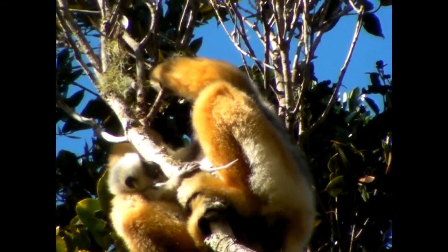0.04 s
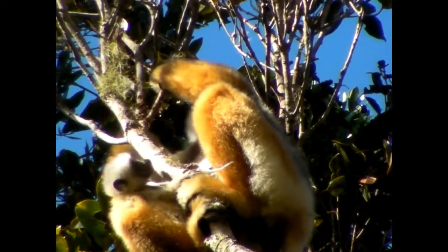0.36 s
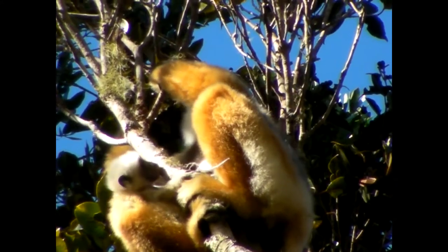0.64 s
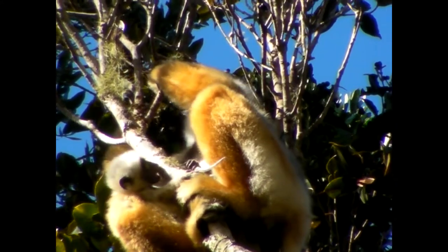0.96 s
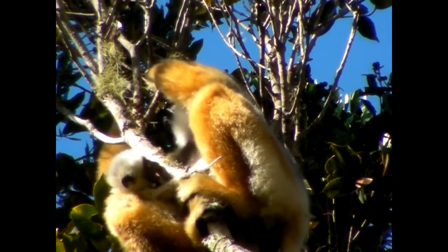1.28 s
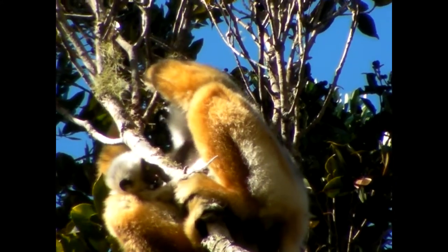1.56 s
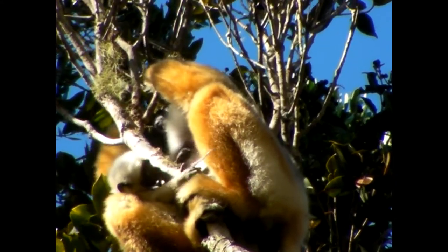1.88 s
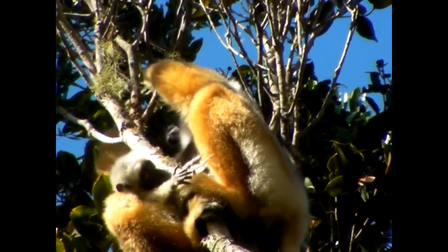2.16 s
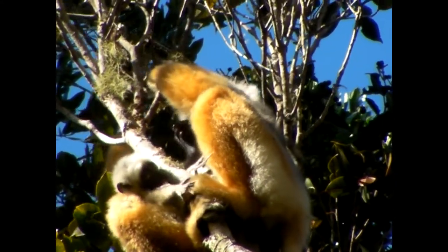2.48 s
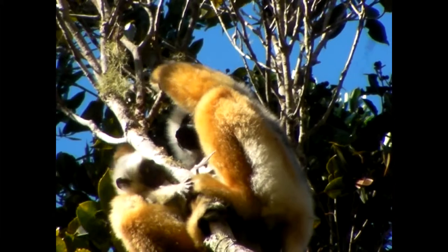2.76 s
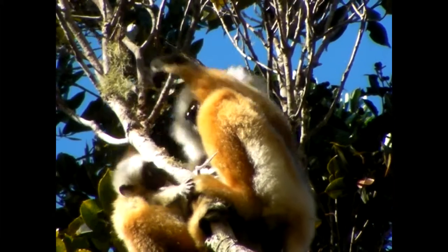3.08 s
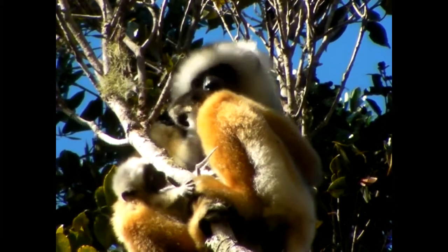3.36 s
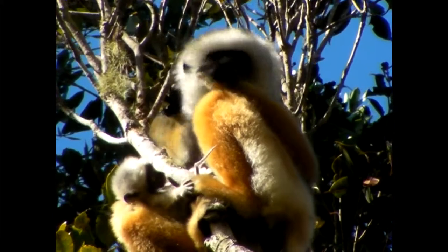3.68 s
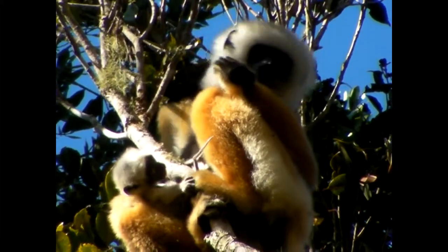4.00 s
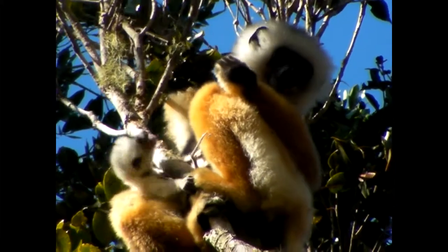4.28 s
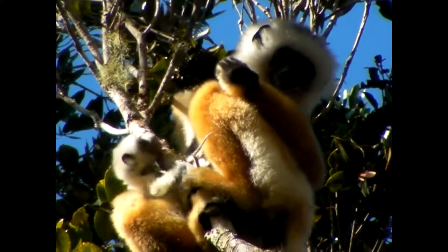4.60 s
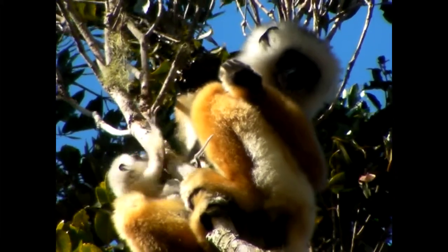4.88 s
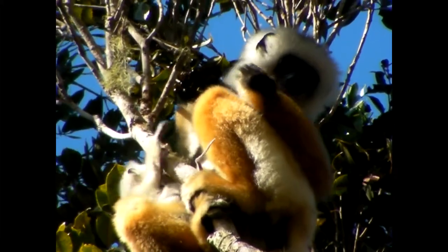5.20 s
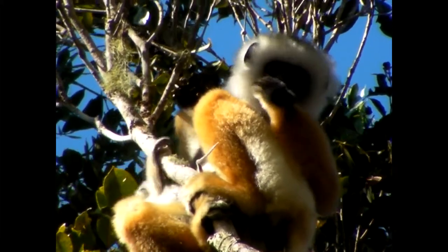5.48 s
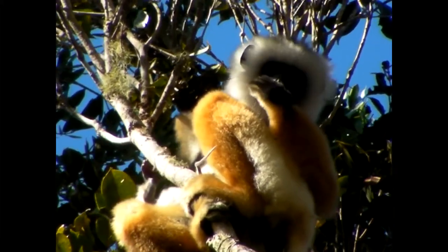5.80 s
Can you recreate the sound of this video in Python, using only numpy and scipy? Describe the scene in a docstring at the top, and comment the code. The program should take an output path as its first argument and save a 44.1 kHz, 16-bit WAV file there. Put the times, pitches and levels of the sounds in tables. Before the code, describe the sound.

Dry leaves click and twigs crack at irregular moments overhead in a still forest, as animals move about on a branch. Soft rubbing and brief swells of leafy hiss run between the snaps. The sharpest cracks cluster just past halfway, after which the movement settles into lighter ticks. The microphone also picks up faint, steady air noise and a slight hollow hum.

```python
"""Lemurs grooming in a treetop

Lemurs groom and shift about overhead on a still day. Twigs and dry leaves break with an impulse,
ring in damped modes and leave a short shiver of foliage. Friction of fur, twigs and leaves makes a
grainy rustle with stray ticks and drags; hiss and rubbing noise swell briefly, mostly around the snaps.
Under it lie faint forest air, microphone hiss and a hollow hum near 420 Hz from the camera body."""
import sys
import numpy as np
from scipy import signal
from scipy.fft import rfft, irfft
from scipy.io import wavfile

SR = 44100
rng = np.random.default_rng(int(sys.argv[2]) if len(sys.argv) > 2 else 0)


def bounce(signal):
    """Save signal as a 16-bit WAV file at the path given by the first command-line argument."""
    frames = np.transpose(np.atleast_2d(signal))
    limited = np.clip(frames, -1, 1)
    pcm = np.round(limited * 32767).astype(np.int16)
    wavfile.write(sys.argv[1], SR, pcm)


N = 266805
HZ = np.fft.rfftfreq(N, 1 / SR)
TIME = np.arange(N) / SR

# left-right coherence of rubbing and of snapping: (frequency [Hz], coherence [0-1])
RUB_COHERENCE = [(60, 0.6), (600, 0.94), (1400, 0.79), (3100, 0.6), (6800, 0.025), (15000, 0.046)]
SNAP_COHERENCE = [(100, 0.71), (2500, 0.91), (5500, 0.46), (9000, 0.46), (15000, 0.32)]
# balance of sound from the tree: (frequency [Hz], left minus right [dB])
TREE_BALANCE = [(60, -1), (500, 2), (1300, 1.1), (2500, 0), (5000, 0), (8500, -2.5), (15000, -3.5)]


def gain_of(db):
    """Amplitude grows tenfold for every 20 dB."""
    return 10 ** (np.asarray(db) / 20)


def unit_rms(x):
    """Normalisation to a mean power of one."""
    return x / np.sqrt(np.mean(x ** 2) + 1e-20)


def unit_energy(x):
    """Normalisation to a total energy of one."""
    return x / np.sqrt(np.sum(x ** 2) + 1e-20)


def curve_at(points, hz):
    """Interpolation along a logarithmic frequency axis."""
    knots_hz, values = np.transpose(points)
    return np.interp(np.log(hz + 1), np.log(knots_hz + 1), values)


def add(mix, start_s, sound):
    """Superposition: a sound adds to the mix from its start time on."""
    part = mix[:, max(round(start_s * SR), 0):][:, :sound.shape[1]]
    part += sound[:, :part.shape[1]]


def drift(cutoff_hz):
    """Low-passed noise gives a slow random modulation of unit rms."""
    return unit_rms(irfft(rfft(rng.standard_normal(N)) / (1 + (HZ / cutoff_hz) ** 4), N))


def coloured(x, spectrum):
    """Zero-phase filtering imposes a spectral envelope, at unit rms."""
    return unit_rms(irfft(rfft(x) * gain_of(curve_at(spectrum, HZ)), N))


def causal(x, gain_db):
    """A minimum-phase filter is causal: nothing rings before the blow."""
    log_gain = np.log(gain_of(np.r_[gain_db, gain_db[-2:0:-1]]))
    response = np.exp(np.conj(signal.hilbert(log_gain)))[:len(gain_db)]
    return irfft(rfft(x) * response)


def stereo(pair, coherence, balance, left_lag_s=0.):
    """Partial coherence: the weighted sum and difference of two signals become left and right."""
    first, second = rfft(pair)
    alike, lean_db = np.clip(curve_at(coherence, HZ), -1, 1), curve_at(balance, HZ) / 2
    mid, side = first * np.sqrt((1 + alike) / 2), second * np.sqrt((1 - alike) / 2)
    delay = np.exp(-2j * np.pi * HZ * left_lag_s)
    return irfft(np.array([(mid + side) * gain_of(lean_db) * delay, (mid - side) * gain_of(-lean_db)]), N)


def gritty(spread_db, size):
    """Tiny slips of very unequal strength make heavy-tailed noise."""
    return rng.standard_normal(size) * gain_of(spread_db * np.minimum(rng.exponential(1, size), 4))


def air_and_hum(level_db=-59, hum_hz=420, width_hz=130, waver_db=3):
    """Broadband noise of faint air and hiss, plus a wavering hollow hum: the camera body's resonance."""
    # air, hiss and the camera body's hum: (frequency [Hz], relative spectral level [dB])
    spectrum = [(25, -32), (75, -12), (160, -8.5), (290, -18), (350, -8.5), (410, 2), (470, -1.5),
                (560, -8), (900, -11.5), (2800, -13), (5000, -13), (8600, -13), (12000, -15.5),
                (16000, -21)]
    # diffuse background: (frequency [Hz], left-right coherence [0-1])
    coherence = [(60, 0.57), (400, 0.65), (1400, 0.23), (3100, 0.14), (6800, 0)]
    # its balance: (frequency [Hz], left minus right [dB])
    balance = [(60, 0.5), (400, 1), (1300, 1.5), (2400, -0.5), (8000, -1), (15000, 0)]
    pair = np.array([coloured(rng.standard_normal(N), spectrum) for _ in range(2)])
    hum = irfft(rfft(pair) * np.exp(-((HZ - hum_hz) / width_hz) ** 2), N)
    pair += hum * (gain_of(waver_db * drift(6.7)) - 1)
    return stereo(pair, coherence, balance) * gain_of(level_db)


def swell_envelope(swells, rise_share=0.38, fade_db=14):
    """Amplitude envelope of short swells that rise and fall exponentially and add in power."""
    power = np.zeros((1, N))
    for peak_s, length_s, db in swells:
        start_s = max(peak_s - 2 * length_s, 0)
        from_peak = (np.arange(start_s, peak_s + 2 * length_s, 1 / SR) - peak_s) / length_s
        drop_db = fade_db * np.maximum(-from_peak / rise_share, from_peak / (1 - rise_share))
        add(power, start_s, gain_of(db - drop_db)[None] ** 2)
    return np.sqrt(power[0])


def rubbing_levels(full_stroke_db=-54.5, effort_slope=1.18):
    """Incoherent sounds add in power: grooming and short swells set fur, scrape and fizz levels in dB."""
    # how hard the animals groom, one long bout and then small shifts: (time [s], effort [dB])
    effort = [(0, -64.5), (.39, -68), (.66, -60.5), (1.0, -65.5), (1.18, -69), (1.45, -54.5), (1.72, -55.5),
              (1.86, -55), (2.07, -57.5), (2.3, -55), (2.68, -56.5), (2.9, -53), (3.05, -60.5), (3.26, -63),
              (3.55, -58.5), (3.8, -59.5), (4.05, -53.5), (4.24, -67), (4.55, -61.5), (4.8, -66),
              (5.7, -59.5), (6.05, -64.5)]
    # short swells of high hiss and rubbing noise, mostly around the snaps, levels relative:
    # (peak time [s], length [s], high hiss [dB], rubbing noise [dB])
    swells = [(.01, .15, -61, -62), (0.301, 0.041, -44, -57), (0.479, .07, -50, -59),
              (0.685, 0.06, -44.5, -57), (0.803, 0.065, -52, -56), (0.897, 0.11, -49.5, -60),
              (1.056, 0.085, -52, -65), (1.28, 0.3, -52, -58), (1.49, .12, -52, -63),
              (1.629, .08, -52, -53), (2.058, 0.37, -50, -59.5), (2.178, 0.17, -50, -53),
              (2.53, 0.14, -40.5, -50), (2.904, 0.21, -55.5, -58), (3.172, 0.09, -40, -55),
              (3.309, .06, -42, -52), (3.396, .07, -42, -49), (3.523, 0.087, -47.5, -51),
              (3.713, 0.1, -43.5, -53), (3.936, .1, -39, -47), (4.076, 0.15, -45, -55.5),
              (4.46, 0.093, -52.5, -60), (4.939, 0.092, -45, -55.5), (5.08, 0.17, -55, -63),
              (5.244, 0.079, -51.5, -59.5), (5.424, 0.17, -53, -60), (5.673, 0.19, -50.5, -63)]
    effort_db = np.interp(TIME, *np.transpose(effort))
    grooming = gain_of(full_stroke_db + effort_slope * (effort_db - full_stroke_db))
    hiss_swells = swell_envelope([(s, length, db) for s, length, db, _ in swells])
    rub_swells = swell_envelope([(s, length, db) for s, length, _, db in swells])
    fur = np.hypot(grooming * gain_of(-1), rub_swells * gain_of(-13.5))
    scrape = np.hypot(grooming * gain_of(-1.5), rub_swells * gain_of(0.5))
    fizz = np.hypot(grooming, hiss_swells * gain_of(-1))
    return 20 * np.log10([fur, scrape, fizz])


def catches(per_s, spread_db, decay_s):
    """Shot noise: leaf catches on leaf at random, each pulse of power decaying exponentially."""
    onsets = rng.random(N) < per_s / SR
    strengths = gain_of(spread_db * np.minimum(rng.exponential(1, N), 3))
    power = signal.lfilter([1], [1, -np.exp(-1 / (decay_s * SR))], onsets * strengths ** 2)
    return power / power.mean()


def rubbing(level_db, spectrum, grains, grain_share, flutter_db):
    """Friction noise: smooth sliding and small catches share one envelope and one spectrum."""
    grip = np.sqrt(1 - grain_share + grain_share * grains) * gain_of(flutter_db * drift(32))
    return np.array([coloured(grip * gritty(2, N), spectrum) for _ in range(2)]) * gain_of(level_db)


def rustle(fur_db, scrape_db, fizz_db):
    """Sliding friction in three bands: low fur on bark, the scrape of twigs, the high fizz of leaves."""
    # the three kinds of rubbing: (frequency [Hz], relative spectral level [dB])
    fur_spectrum = [(25, -26), (75, -3), (270, -7.5), (420, 7.5), (560, 0.5), (1100, -1.5), (1700, -4),
                    (3000, -27)]
    scrape_spectrum = [(700, -7.5), (1500, 0), (2700, 0.5), (3700, 1.5), (4500, -9.5), (7000, -24)]
    fizz_spectrum = [(2500, -40), (4400, -1), (5500, -2), (7000, 0), (8600, 3), (10200, -1.5), (11700, 2),
                     (13500, -3), (16000, -9)]
    grains = catches(per_s=170, spread_db=4.5, decay_s=0.001)
    fur = rubbing(fur_db, fur_spectrum, grains, grain_share=0.29, flutter_db=1)
    scrape = rubbing(scrape_db, scrape_spectrum, grains, grain_share=0.16, flutter_db=2)
    sharp_grains = catches(per_s=100, spread_db=7, decay_s=0.00076)
    fizz = rubbing(fizz_db, fizz_spectrum, sharp_grains, grain_share=0.028, flutter_db=1.98)
    return stereo(fur + scrape + fizz, RUB_COHERENCE, TREE_BALANCE, left_lag_s=20e-6)


def drags():
    """Stick-slip friction: a dragging claw or twig excites one resonance of a branch."""
    # drags: (peak time [s], half length [s], resonance [Hz], bandwidth per stage [Hz], level [dB])
    strokes = [(1.222, 0.032, 7400, 900, -59), (1.218, 0.028, 9800, 1200, -58.5),
               (1.289, 0.034, 554, 420, -55), (2.203, 0.066, 2820, 804, -54.5),
               (2.422, 0.16, 2520, 400, -58.5), (2.971, 0.019, 6700, 900, -52.5),
               (3.519, 0.025, 990, 320, -54), (4.406, 0.023, 2700, 1500, -55),
               (4.59, 0.029, 3860, 1600, -54.5), (4.617, 0.069, 3420, 800, -57.5),
               (5.436, 0.043, 3400, 800, -58), (5.713, 0.16, 6440, 1100, -60.5),
               (5.974, 0.02, 7300, 910, -55.5)]
    pair = np.zeros((2, N))
    for peak_s, half_s, hz, width_hz, db in strokes:
        swell = np.hanning(round(2 * half_s * SR))
        radius = np.exp(-np.pi * width_hz / SR)
        resonator = [1, 0, -1], [1, -2 * radius * np.cos(2 * np.pi * hz / SR), radius * radius]
        slips = gritty(5.8, (2, len(swell)))
        ringing = signal.lfilter(*resonator, signal.lfilter(*resonator, slips))
        add(pair, peak_s - half_s, gain_of(db) * unit_rms(ringing) * swell)
    return stereo(pair, RUB_COHERENCE, TREE_BALANCE)


def ticks(scrape_db, fizz_db, count=130, over_db=5, decay_s=0.0012, size=512):
    """Single leaves tick: noise bursts through a broad resonance, their level following the rubbing."""
    pair, t = np.zeros((2, N)), np.arange(size) / SR
    for when, pitch, force, place in rng.random((count, 4)):
        hz = 1200 * 9 ** pitch
        tear = rng.standard_normal(size) * np.exp(-t / decay_s)
        tick = unit_energy(signal.lfilter(*signal.iirpeak(hz, Q=1.5, fs=SR), tear))
        rubbing_db = (scrape_db if hz < 4500 else fizz_db)[int(when * N)]
        db = rubbing_db + over_db - np.log(max(force, 0.1))  # a few are slightly stronger
        add(pair, when * N / SR, np.outer([1, place - 0.5], tick) * gain_of(db) * np.sqrt(decay_s * SR))
    return stereo(pair, SNAP_COHERENCE, TREE_BALANCE)


def modal_ring(t, pitch_hz, radiation_hz=450, detune=0.0081):
    """Free vibration in damped modes; a thin body radiates its low ones poorly."""
    # modes of a dry twig: (frequency [multiple of pitch], level [dB], decay time [cycles of pitch])
    modes = [(0.209, -12, 7.2), (.51, -11, 2.9), (.8, -16, 5.5), (1, 9, 3.9)]
    ring = 0
    for multiple, db, cycles in modes:
        hz = pitch_hz * multiple * (1 + detune * rng.standard_normal())
        radiated = gain_of(db) * hz / np.hypot(hz, radiation_hz)
        ring += radiated * np.exp(-t * pitch_hz / cycles) * np.sin(2 * np.pi * hz * t)
    swell = 1 - np.exp(-t * pitch_hz)  # the motion takes a cycle to build
    return unit_energy(ring * swell) * rng.choice([-1, 1])


def crack_colour(hz, wood_db, dull_hz, blade_db, blade_hz):
    """Wood and leaf break together, so their power spectra add; the result is in dB."""
    # cracking wood: (frequency [multiple of dull_hz], relative level [dB])
    wood_shape = [(.03, -1.5), (.1, -3.5), (.22, -0.5), (.55, 0), (1, -3), (1.4, -9), (4, -31)]
    # crackling leaf blade: (frequency [multiple of blade_hz], relative level [dB])
    blade_shape = [(.12, -33), (.4, -5.5), (.65, -3), (1, 4), (1.35, 0), (1.9, -4)]
    wood = unit_rms(gain_of(curve_at([(ratio * dull_hz, db) for ratio, db in wood_shape], hz)))
    blade = unit_rms(gain_of(curve_at([(ratio * blade_hz, db) for ratio, db in blade_shape], hz)))
    return 20 * np.log10(np.hypot(gain_of(wood_db) * wood, gain_of(blade_db) * blade))


def snap(wood_db, dull_hz, blade_db, blade_hz, shiver_db, spike_share, pitch_hz, ring_db,
         spike_s=0.00018, splinter_s=0.0042, crack_s=0.004, near_s=0.0055, far_s=0.036, size=8192):
    """Brittle fracture: a fibre breaks with a spike, splinters, excites modes and shakes the leaves."""
    # microphone colour of every snap: (frequency [Hz], gain [dB])
    presence = [(30, -15), (90, -4.5), (270, -6.5), (430, -3), (750, -2.5), (1100, -6), (3700, 1),
                (4500, -3.5), (7000, 0.5), (8500, 1.5), (10200, -2.5), (11700, 1.5), (16000, -8.5)]
    t, hz = np.arange(size) / SR, np.fft.rfftfreq(size, 1 / SR)
    spike_share = np.clip(spike_share, 0.05, 0.95)
    colour_db = crack_colour(hz, wood_db, dull_hz, blade_db, blade_hz)
    presence_db = curve_at(presence, hz)
    bass_cut_db = -20 * np.log10(1 + 1500 / (hz + 50))
    push = causal(np.eye(1, size, 4)[0], -10 * np.log10(1 + (hz / 3500) ** 2))  # low-passed impulse
    tear_fade = (1 + t / spike_s) * np.exp(-t / 0.0003)
    # the nearest leaves answer at once, the crown behind them more slowly
    shiver_fade = (1 - np.exp(-t / 0.0016)) * (np.exp(-t / near_s) + 0.96 * np.exp(-t / far_s))
    shiver_colour_db = 0.81 * colour_db + presence_db - hz / 5000
    pair = []
    for direct in (1, 0):  # the scattered path lacks the clean push and the ring
        tear = unit_energy(causal(rng.standard_normal(size) * tear_fade, bass_cut_db))
        spike = unit_energy(tear + 0.5 * direct * push * rng.choice([-1, 1]))
        splinters = unit_energy(gritty(2.5, size) * np.exp(-t / splinter_s))
        fracture = np.sqrt(spike_share) * spike + np.sqrt(1 - spike_share) * splinters
        crack = gain_of(0.5) * causal(fracture, colour_db + presence_db)
        ring = direct * gain_of(ring_db) * modal_ring(t, pitch_hz)
        shiver = unit_energy(causal(gritty(3.6, size) * shiver_fade, shiver_colour_db))
        shiver *= gain_of(shiver_db - 4.5)
        pair.append(np.sqrt(crack_s * SR) * (crack + ring) + np.sqrt(far_s * SR) * shiver)
    return np.array(pair)


def snaps(twig_leaf_hz=7200, twig_side_db=-0.3, stalk_dull_hz=3320, blade_ring_db=-11.5):
    """Sudden release of strain: twigs crack near the animals, leaves buckle across the crown."""
    # cracking twigs, levels relative: (time [s], wood crack [dB], dull above [Hz], leaf crackle [dB],
    # foliage shiver [dB], spike share [0-1], pitch [Hz], ring [dB])
    twigs = [(.469, -38.5, 5500, -57, -60, 0.3, 3490, -58), (0.4719, -43, 5970, -64, -46.5, .18, 3470, -46),
             (1.0622, -41, 1820, -50, -66, 0.7, 746, -82), (1.2519, -48.5, 3400, -60, -60, 0.5, 2420, -56),
             (1.2768, -51, 1100, -61, -54, .2, 563, -50), (1.959, -46, 2800, -60, -51, 0.4, 1120, -52),
             (2.341, -49, 2500, -52, -50, .3, 1130, -52), (2.4154, -53, 3700, -58, -60, 1, 3200, -49),
             (2.621, -47.5, 3500, -49, -64, 0.3, 2130, -51), (2.7689, -49, 2800, -65, -64, .4, 2900, -53),
             (3.1163, -57, 3200, -62, -50.5, .37, 2920, -53.5),
             (3.3942, -24, 2780, -55, -45.5, 0.91, 3660, -34.5),
             (3.516, -44, 3000, -57, -55, 0.3, 2840, -49),
             (3.6056, -35.5, 2570, -37.5, -49.5, 1, 1970, -38.5),
             (3.6493, -41.5, 2400, -41, -53, .55, 586, -49),
             (4.061, -35, 2370, -35.5, -45.5, .75, 577, -45),
             (4.4488, -45, 4200, -48, -51, 0.2, 3400, -47.5),
             (4.666, -37.5, 4180, -41, -51.5, 0.5, 3020, -51),
             (4.6738, -45.5, 2200, -52, -64, 0, 2680, -40.5),
             (4.8148, -46.5, 3300, -68, -73, 0.3, 3150, -47), (4.847, -40.5, 1500, -80, -66, 1, 720, -54),
             (5.274, -54, 2500, -69, -75, 0.5, 2130, -49), (5.4192, -49, 3220, -62, -53.5, .45, 2380, -52),
             (5.6667, -36.5, 3570, -45, -45, 0.66, 3230, -51),
             (6.0073, -50.5, 4200, -55, -57, 0.8, 3150, -56)]
    # buckling leaves, levels relative: (time [s], blade crackle [dB], pitch [Hz], stalk crack [dB],
    # foliage shiver [dB], spike share [0-1], left minus right [dB])
    leaves = [(.1446, -45.5, 9000, -60, -53, 1, -1), (0.3022, -39, 8800, -51, -51, 0.6, 2),
              (0.3032, -38.5, 10800, -49.5, -47.5, 0.7, -3), (0.6951, -41.5, 8650, -43.5, -58, .85, -.5),
              (0.7852, -46.5, 8500, -50, -50.5, 0.5, -11), (.7913, -44.5, 11000, -54, -48, 0.2, 6),
              (.891, -44, 7800, -56, -49.5, 0.5, 0), (.909, -37, 12000, -64, -63, .8, -5),
              (1.3662, -40, 8250, -53, -47, 0.9, -2), (1.8085, -48, 8500, -61, -54, .55, -1),
              (1.997, -43, 8700, -41.5, -50.5, 0.7, -1), (2.0272, -48, 7900, -48, -53, .57, -1),
              (2.136, -47, 9000, -52, -51.5, 0.5, 3), (2.5, -39, 9100, -47, -54, .35, -.5),
              (2.509, -36, 8900, -47, -56, 0.9, .5), (2.5117, -33, 9200, -44, -48, .85, 0),
              (2.513, -32, 8900, -57, -49, 1, -5), (2.5415, -36, 11000, -46, -52, 0.1, -1),
              (2.5464, -40, 10900, -50.5, -57, .25, -5), (3.1629, -39, 9400, -40, -44.5, 0.5, -1),
              (3.218, -44, 8500, -52, -48, 0.2, 0), (3.3084, -30, 8260, -41, -41, 0.85, -1),
              (3.478, -43, 6400, -51, -49, 0.9, -1), (3.6778, -47, 8600, -39, -55, 0.8, 1),
              (3.6963, -40, 7400, -43, -48.5, 0.77, -3), (3.736, -44, 9000, -66.5, -56, 0.9, -4),
              (3.82, -51, 8600, -65, -54, .3, -2), (3.855, -50, 8500, -52, -57, 0, 0),
              (3.9354, -26, 8700, -36, -49, 0.43, -1.5), (3.9782, -38, 10900, -40.5, -48, 0.2, -1),
              (3.9803, -34.5, 8300, -41, -62, 0.5, .5), (4.038, -31.5, 10000, -39, -37.5, 0.4, 1),
              (4.0735, -41, 8600, -59, -49, 0.4, 4), (4.158, -47, 9300, -52, -53, .6, 0),
              (4.2134, -52, 8900, -57, -54.5, .5, 0), (4.8994, -52, 8900, -61, -50, .8, -.5),
              (5.073, -44, 11800, -53, -49, 0.3, -2), (5.0855, -39.5, 10800, -45, -48, 0.8, 0),
              (5.3983, -40, 11000, -50, -50, .8, -1)]
    events = [(s, twig_side_db, snap(wood_db, dull_hz, blade_db, twig_leaf_hz, *rest))
              for s, wood_db, dull_hz, blade_db, *rest in twigs]
    for s, blade_db, hz, stalk_db, shiver_db, share, side_db in leaves:
        pair = snap(stalk_db, stalk_dull_hz, blade_db, hz, shiver_db, share, hz, blade_db + blade_ring_db)
        events.append((s, side_db, pair))
    left, right = np.zeros((2, 2, N))
    for s, side_db, pair in events:
        add(left, s, pair * gain_of(side_db / 2))
        add(right, s, pair * gain_of(-side_db / 2))
    return np.array([stereo(paths, SNAP_COHERENCE, TREE_BALANCE, left_lag_s=12e-6)[channel]
                     for channel, paths in enumerate((left, right))])


def scene():
    """Superposition of snaps, ticks, drags and rustle on the faint air and hum."""
    fur_db, scrape_db, fizz_db = rubbing_levels()
    treetop = snaps() + ticks(scrape_db, fizz_db) + drags() + rustle(fur_db, scrape_db, fizz_db)
    return treetop + air_and_hum()


def record(dry):
    """Band limiting: a linear-phase low-pass filter removes the highest treble."""
    low_pass = signal.firwin(401, cutoff=16050, window=("kaiser", 9), fs=SR)
    return signal.oaconvolve(dry, low_pass[None], "same")


dry = scene()
out = record(dry)
bounce(out)
```